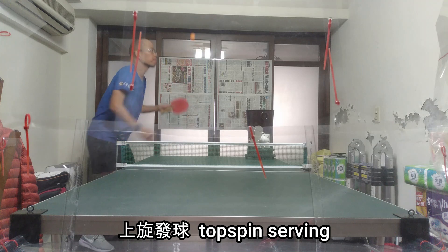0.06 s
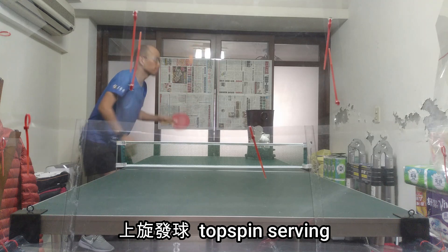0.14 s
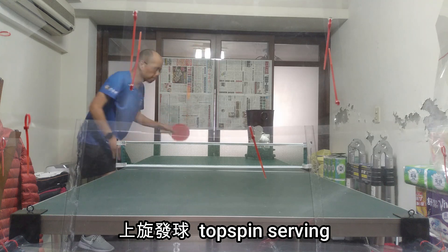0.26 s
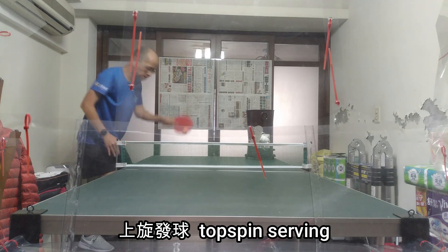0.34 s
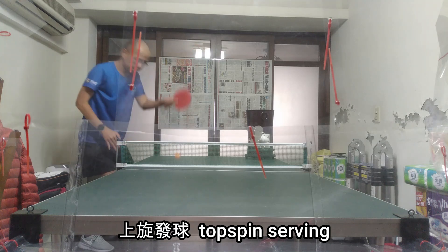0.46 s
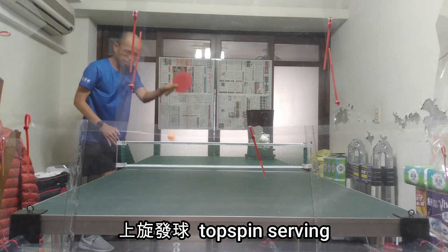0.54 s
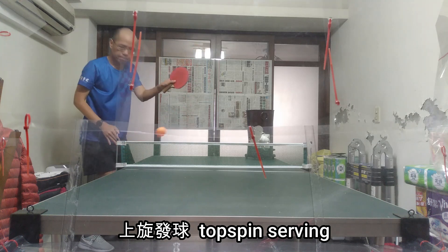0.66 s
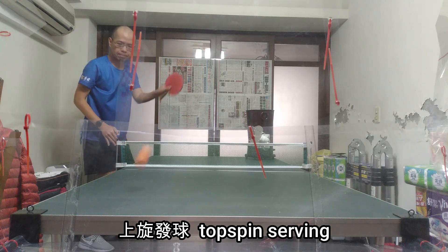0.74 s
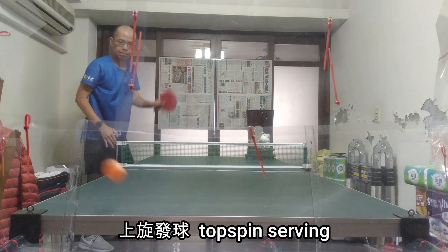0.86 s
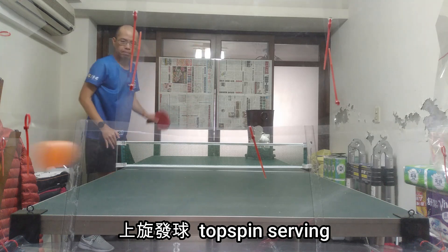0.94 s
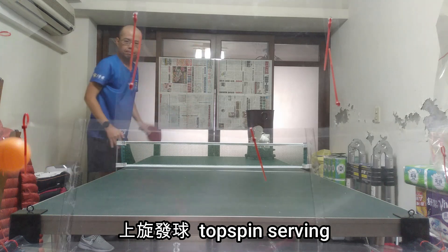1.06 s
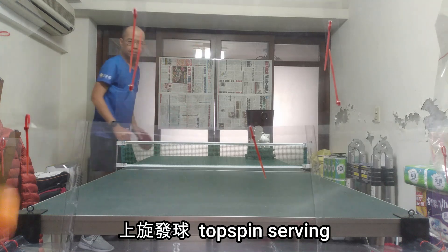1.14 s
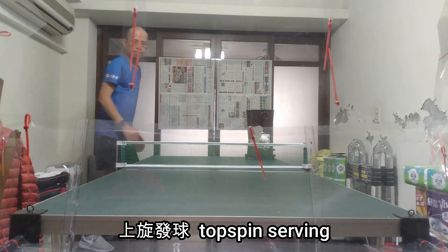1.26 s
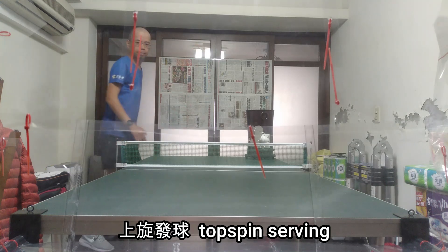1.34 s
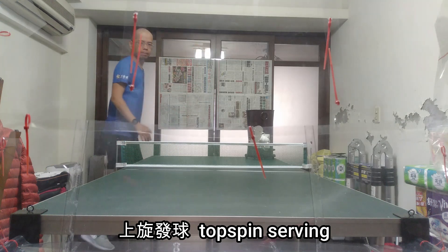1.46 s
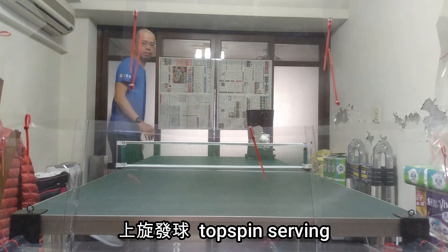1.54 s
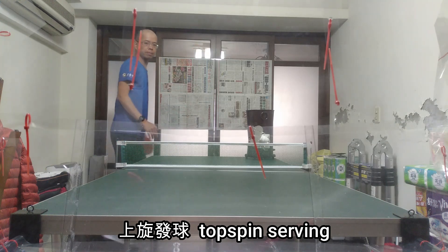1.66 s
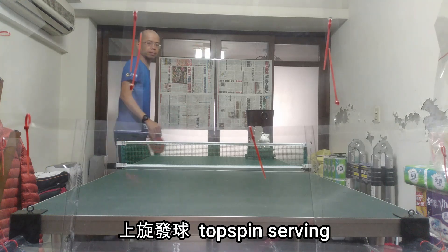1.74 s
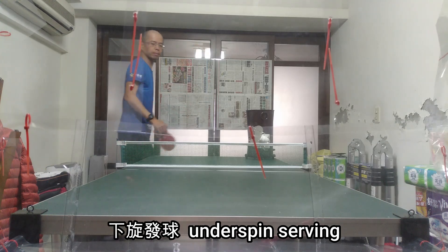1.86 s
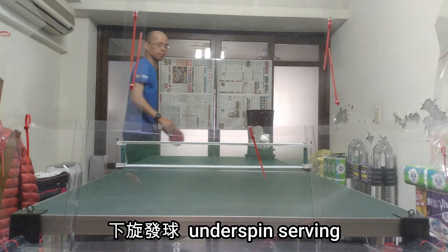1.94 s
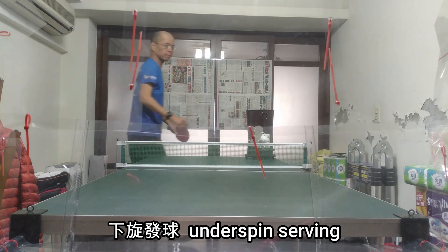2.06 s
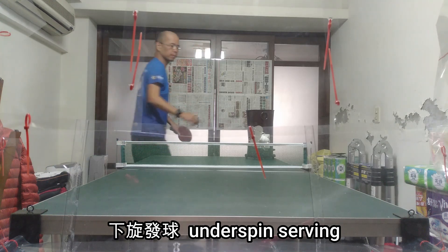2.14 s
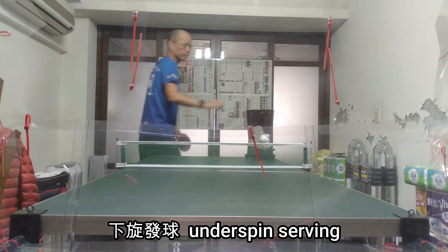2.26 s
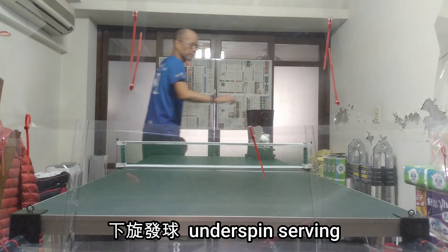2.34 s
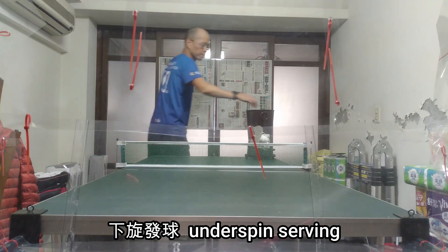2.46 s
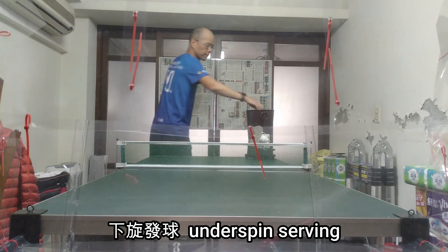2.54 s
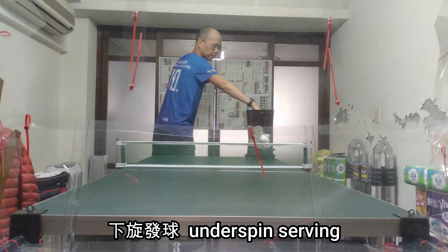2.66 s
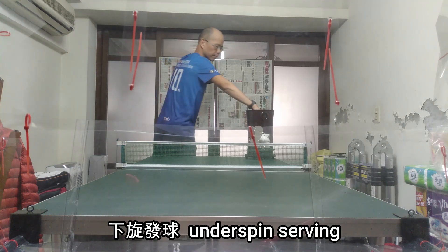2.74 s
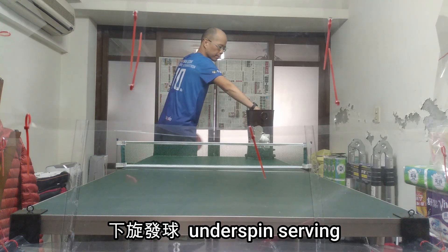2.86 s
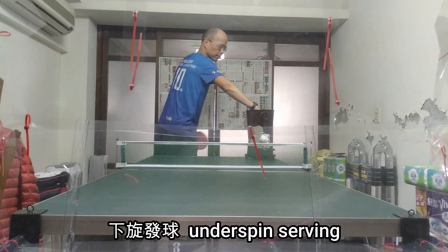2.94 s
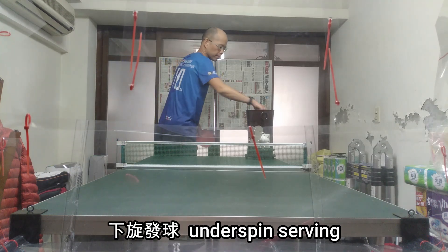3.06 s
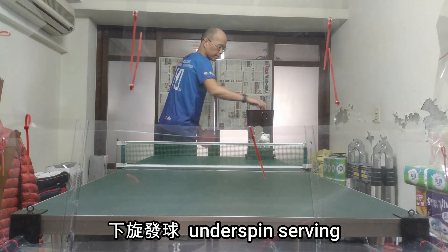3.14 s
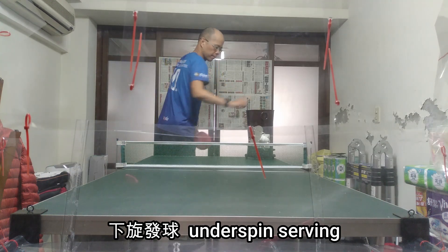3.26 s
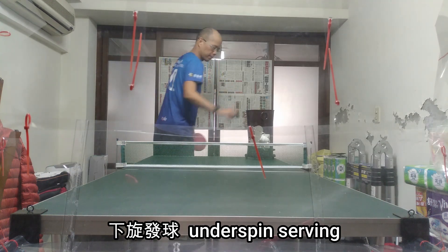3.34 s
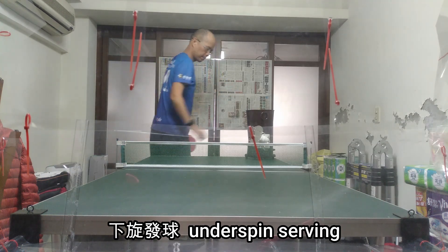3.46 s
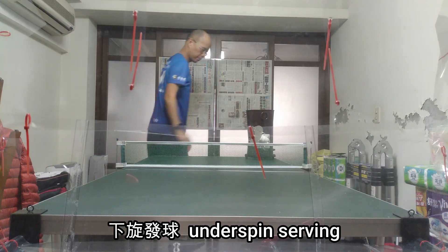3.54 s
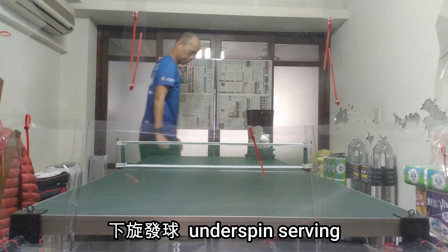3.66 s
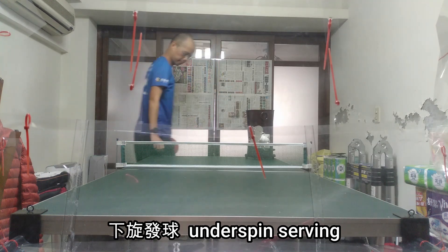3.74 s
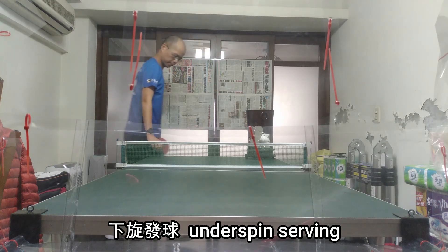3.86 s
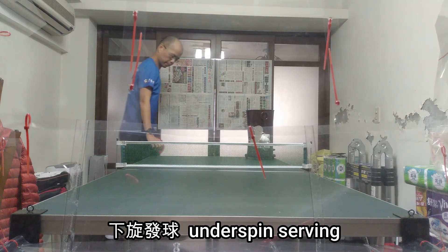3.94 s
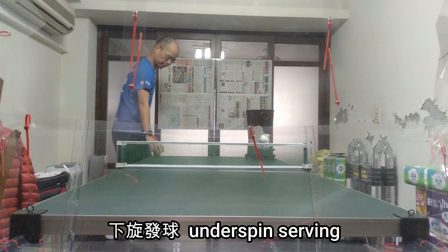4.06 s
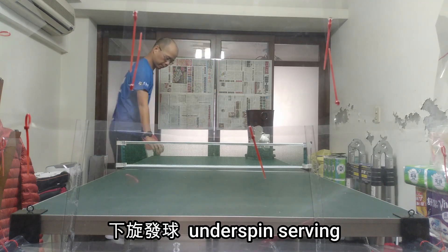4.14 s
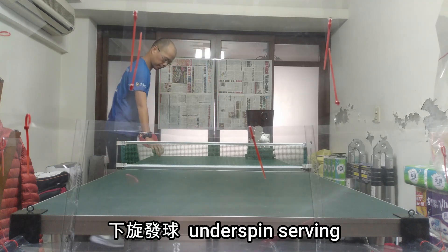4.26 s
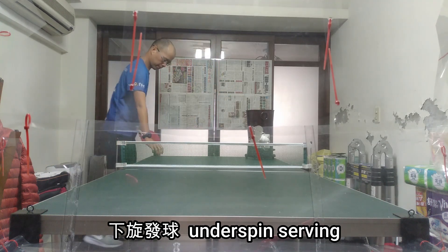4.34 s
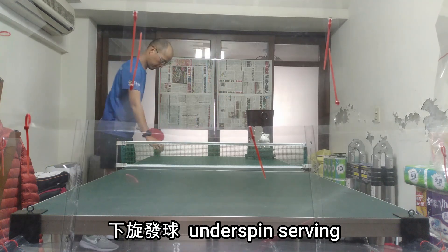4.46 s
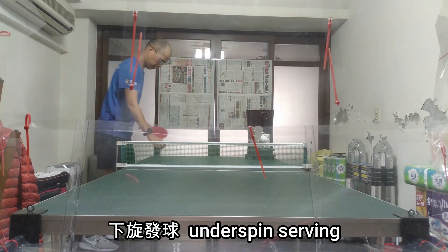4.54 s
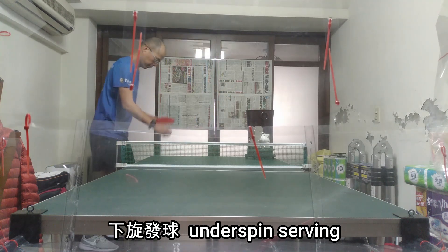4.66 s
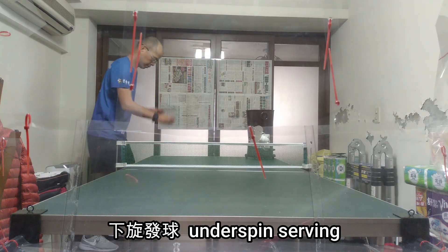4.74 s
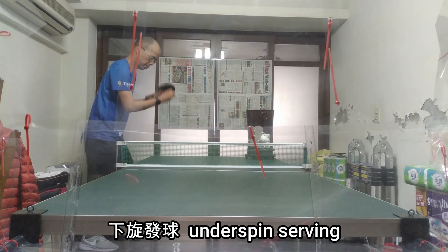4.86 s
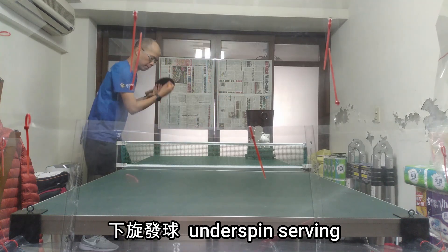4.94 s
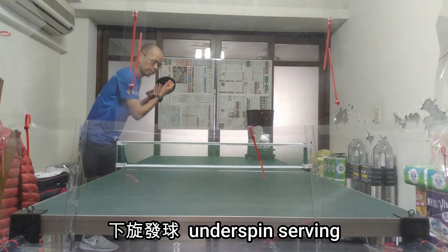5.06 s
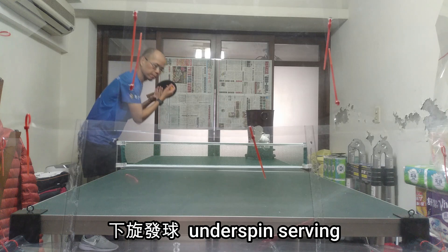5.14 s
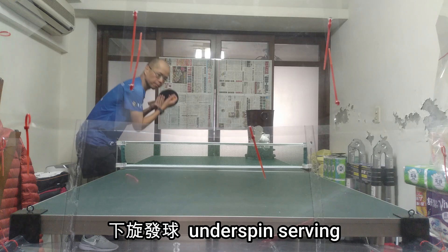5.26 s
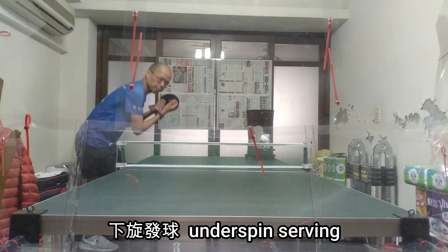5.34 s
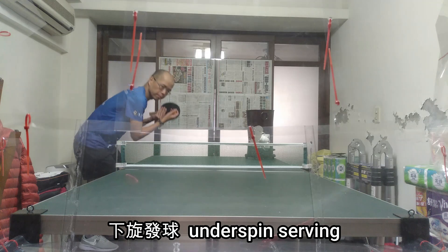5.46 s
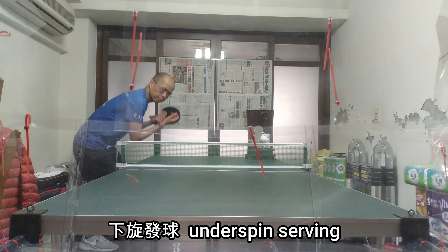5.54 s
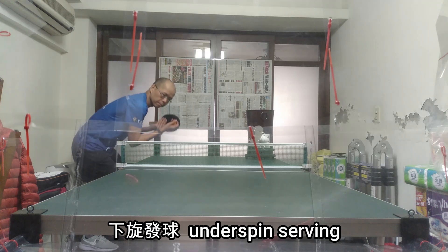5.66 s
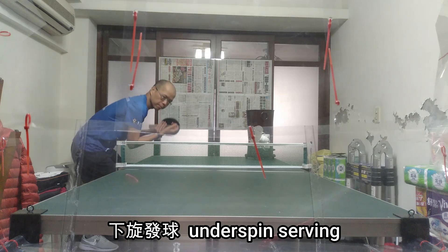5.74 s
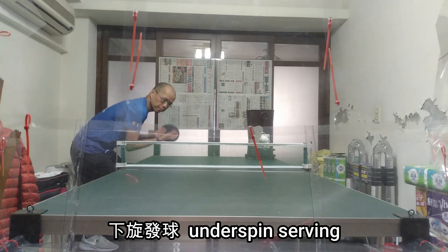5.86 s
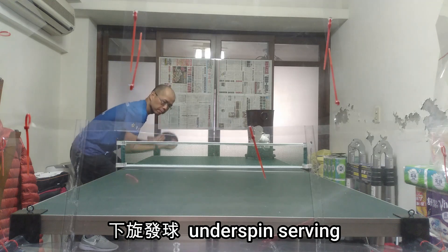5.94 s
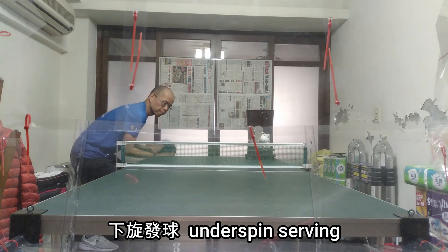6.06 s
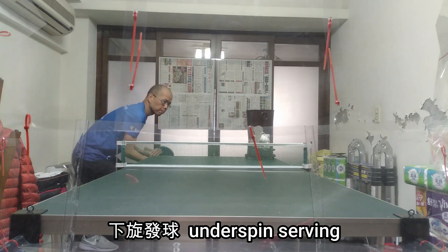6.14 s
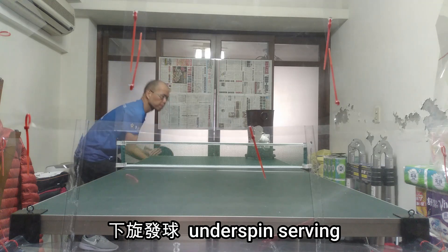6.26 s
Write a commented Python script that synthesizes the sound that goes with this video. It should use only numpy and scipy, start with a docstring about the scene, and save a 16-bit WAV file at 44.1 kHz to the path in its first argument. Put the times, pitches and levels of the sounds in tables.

```python
"""Table tennis ball in a small, hard-walled room, heard from the near end of the table.
A serve clicks off the paddle, bounces on both halves, knocks a guard panel by the microphone, ticks on the floor.
The player steps to a box of balls, rummages for one, walks back and bounces it twice on the far end.
Blows are contact pulses, body colours and ringing partials through a synthetic room; shaped noise makes
the sole brushes, the deep rumble that swells once, and the steady room air."""
import sys
import numpy as np
from scipy import signal
from scipy.fft import rfft, irfft
from scipy.io import wavfile

SR = 44100
rng = np.random.default_rng(int(sys.argv[2]) if len(sys.argv) > 2 else 0)


def persist_wave(psi):
    """Save psi, clipped to +-1, as 16-bit WAV."""
    counts = np.round(np.clip(psi, -1, 1) * 32767).astype(np.int16)
    wavfile.write(sys.argv[1], SR, np.atleast_2d(counts).T)


N = 277830
RING = SR  # samples per blow: 1 s
AGE = np.arange(RING) / SR  # s since the blow
FREQ = np.arange(RING // 2 + 1) * SR / RING  # Hz


# paddle strokes: [t/s, level/dB, contact/ms, bass/dB, treble/dB, direct sound/dB]
PADDLE_STROKES = [(0.3787, -31, .62, 1, -5.5, -18)]
# paddle sound per unit contact force: [f/Hz, level/dB]
PADDLE_COLOUR = [(100, -22.5), (455, -25.5), (500, -10.5), (560, -1.5), (680, -7.5), (920, -5.5),
                 (1080, 4.5), (1600, 1.5), (2200, 4.5), (3200, 0.5), (4500, 3.5), (7000, 12), (11000, 2),
                 (15000, 0)]


def strokes():
    """Rubber paddle: a lossy contact pulse drives the blade and the ball's shell."""
    out = np.zeros(N)
    for t_s, level_db, contact_ms, bass_db, treble_db, direct_db in PADDLE_STROKES:
        click = contact(contact_ms, loss=2.2) * body(PADDLE_COLOUR, bass_db, treble_db) * shell(db=2.5)
        add(out, t_s, level_db, click * room(direct_db, early_db=6.0))
    return out


# ball on table: [t/s, level/dB, contact/ms, edge nearness/0-1, bass/dB, treble/dB, direct sound/dB]
TABLE_BOUNCES = [(0.5018, -29.5, 0.61, 0.08, 2, -4, -24), (0.8539, -30.5, .635, 0, 0, -8, -16),
                 (4.1106, -36.5, 0.63, 0.43, 0.5, -6, -10), (4.3166, -40.5, 0.587, 0.31, 2, -6.5, -27)]
# table sound per unit contact force: [f/Hz, level/dB]
TABLE_COLOUR = [(50, -29.5), (75, -18.5), (130, -1.5), (220, -0.5), (330, -3.5), (480, 0.5), (750, 2.5),
                (1250, 2.5), (2000, 7.5), (3200, 13.5), (5000, 22), (7000, 23), (11000, 13.5), (15000, 8.5)]
# colour change where the frame stiffens the edge: [f/Hz, level/dB]
EDGE_COLOUR = [(100, -3.5), (140, 5), (185, 7), (300, -1), (550, -17), (850, -5.5), (1200, 14),
               (1600, -1.5), (2200, -7), (4000, -6)]
# lowest bending modes of the table: [f/Hz, level/dB, t60/s]
TABLE_BENDING = [(92.4, -14, 0.89), (137.8, -13, 0.82), (216.4, -19.5, .45)]
TABLE_LOSS, BOOM_BUILD_S = 0.72, 0.02


def bounces():
    """Table top: a contact pulse clicks the plate and its bending modes boom."""
    out = np.zeros(N)
    for t_s, level_db, contact_ms, edge, bass_db, treble_db, direct_db in TABLE_BOUNCES:
        top = body(TABLE_COLOUR, bass_db, treble_db) * body(EDGE_COLOUR) ** edge
        click = contact(contact_ms, TABLE_LOSS) * top * shell(db=2)
        heard = unit(click * room(direct_db, build_s=0.004, early_db=3.0))
        boom = undb(-12 * edge) * ring(TABLE_BENDING, BOOM_BUILD_S)  # middle booms most
        add(out, t_s, level_db, heard + boom)
    return out


# ball hopping on the floor: [t/s, level/dB]
FLOOR_HOPS = [(1.7156, -57.5), (1.8420, -60), (1.9825, -68.5)]
# colour of a floor hop: [f/Hz, level/dB]
HOP_COLOUR = [(300, -8), (1000, 1.5), (1800, 16), (3500, 23.5), (5500, 19.5), (8000, 34.5), (11000, 28.5),
              (15000, 22)]
HOP_DIRECT_DB, HOP_PING_DB = -7, -9


def hops():
    """Hard floor: a longer contact pulse gives faint, bright ticks."""
    out = np.zeros(N)
    for t_s, level_db in FLOOR_HOPS:
        tick = contact(ms=0.884, loss=1.0) * body(HOP_COLOUR) * shell(db=HOP_PING_DB)
        add(out, t_s, level_db, tick * room(HOP_DIRECT_DB, dull_hz=6000))
    return out


def contact(ms, loss):
    """Half-sine push of the ball: its length cuts evenly spaced notches, which a lossy contact fills in."""
    part = np.minimum(AGE * 1000 / ms, 1)
    return rfft(np.sin(np.pi * part) * np.exp(-loss * part))


# resonances of the ball's hollow shell: [f/Hz, width/Hz, level/dB]
SHELL_MODES = [(8450, 200, 17), (9940, 630, 9.5), (11000, 400, 9.5), (12450, 400, 4.5)]


def shell(db):
    """The ball's own resonances add a thin ping on top of a blow."""
    ping = 0
    for hz, width_hz, gain_db in SHELL_MODES:
        damping = 1j * FREQ * width_hz
        ping = ping + undb(db + gain_db) * damping / (hz ** 2 - FREQ ** 2 + damping)
    return 1 + ping


# ball against the guard panel: [t/s, level/dB, bass/dB, treble/dB, direct sound/dB]
PANEL_KNOCKS = [(1.0289, -23, 2, -1.5, -1.5), (1.2902, -30, 1.5, -4, -16), (1.6087, -42, -7, -6, -0.5)]
# colour of a knock: [f/Hz, level/dB]
KNOCK_COLOUR = [(30, -26.5), (70, -2), (300, -6.5), (600, 2), (900, -1.5), (1400, -2.5), (2200, -5),
                (3500, -8.5), (6800, -10.5), (8200, -22), (9800, -32), (15000, -48)]
# ringing partials heard after a knock near the microphone: [f/Hz, level/dB, t60/s]
KNOCK_PARTIALS = [(91.5, -7, 0.53), (447, -10, 0.19), (593, -1, 0.43), (666, -9.5, 0.2), (789, -6.5, 0.59),
                  (853, -6.5, .5), (1059, -9.5, 0.56), (1237, -7.5, 0.6), (1408, -3.5, 0.34),
                  (1720, -6.5, 0.27), (2111, -11.5, 0.54), (2380, -12.5, 0.71), (2751, -9, 0.3),
                  (3520, -11, 0.4)]
CRACK_DB, CRACK_DECAY_S = -4.5, 0.0045  # before knock colour; dB re direct-path gain
KNOCK_RING_DB = -14


def knocks():
    """The stray ball hits the guard panel: a click, a brief crack and a mixed ring of panel and room."""
    out = np.zeros(N)
    for t_s, level_db, bass_db, treble_db, direct_db in PANEL_KNOCKS:
        burst = rng.standard_normal(RING) * np.exp(-AGE / CRACK_DECAY_S)
        crack = undb(direct_db + CRACK_DB) * unit(rfft(burst))
        path = room(direct_db, build_s=0.0013, early_db=0.5, early_s=0.054, dull_hz=1700) + crack
        knock = body(KNOCK_COLOUR, bass_db, treble_db, treble_hz=4450) * path
        add(out, t_s, level_db, unit(knock) + undb(KNOCK_RING_DB) * ring(KNOCK_PARTIALS))
    return out


# balls jostling in the box: [t/s, level/dB, bass/dB, treble/dB]
BOX_JOSTLES = [(2.7255, -62.5, -10, 10), (2.757, -57, 1, 7), (2.775, -55, 5, 3), (2.8265, -54, 9, -5),
               (2.8768, -50, 4, 3), (2.940, -54, -4, 3.5), (3.019, -57.5, 5, -12), (3.091, -48, -10.5, 2.5),
               (3.116, -48.5, 0, 5), (3.2545, -56.5, -15, -3.5)]
# colour of the box of balls: [f/Hz, level/dB]
BOX_COLOUR = [(150, -6), (330, 1), (540, -1), (650, 10.5), (820, 4.5), (1150, 3.5), (1800, -6.5),
              (3200, -11), (5000, -23), (8000, -26), (11000, -39), (15000, -46)]
BOX_DIRECT_DB = -9.5


def ball_box():
    """A hand stirs the balls: each one it moves knocks three neighbours in quick succession."""
    out = np.zeros(N)
    for t_s, level_db, bass_db, treble_db in BOX_JOSTLES:
        lags_s = rng.uniform(0.00221, 0.03, size=3)
        chain = 1 + undb(-9.5) * sum(np.exp(-2j * np.pi * FREQ * lag_s) for lag_s in lags_s)
        rattle = chain * body(BOX_COLOUR, bass_db, treble_db) * shell(db=-8)
        add(out, t_s, level_db, rattle * room(BOX_DIRECT_DB, build_s=0.0012, early_db=1))
    return out


# footfalls: [t/s, level/dB, bass/dB, scuff/dB, floor boom/dB]
FOOTFALLS = [(.032, -55.5, -5.5, -9, -8), (2.082, -51.5, -6, -19, -9), (3.906, -55, -3.5, -18, -4),
             (3.97, -46.5, 10, -21, 9), (4.486, -49.5, -2, -15, -0.5), (4.996, -50.5, -3, -8, -4),
             (5.095, -53, -2.5, -17.5, -4.5)]
# colour of a footfall: [f/Hz, level/dB]
FOOT_COLOUR = [(25, -28.5), (45, -13), (70, -0.5), (130, 0.5), (220, -5.5), (350, -16), (700, -13.5),
               (2000, -29), (7000, -27.5), (12000, -62)]
# deep modes the player's weight sets ringing: [f/Hz, level/dB, t60/s]
FLOOR_BENDING = [(55.2, -2, 0.66), (68.6, 0.5, 0.43), (132.3, -4, .8)]
STEP_DIRECT_DB, FLOOR_BUILD_S = -8.5, 0.015


def footwork():
    """Soft footfalls thud and set the floor's deep modes booming, each by its own amount."""
    out = np.zeros(N)
    for t_s, level_db, bass_db, scuff_db, boom_db in FOOTFALLS:
        foot = body(FOOT_COLOUR, bass_db, scuff_db, bass_hz=116.9, treble_hz=437)
        thud = foot * room(STEP_DIRECT_DB, build_s=0.0034, early_db=-0.5, dull_hz=700)
        boom = undb(boom_db) * ring(FLOOR_BENDING, FLOOR_BUILD_S)
        add(out, t_s, level_db, unit(thud) + boom)
    return out


# soles brushing the floor: [t/s, level/dB, rise/s]
SOLE_BRUSHES = [(2.236, -69.5, 0.012), (3.755, -70.5, 0.05)]
# colour of a brushing sole: [f/Hz, level/(dB per Hz)]
SOLE_COLOUR = [(300, 0), (850, -0.5), (1500, -7.5), (4500, -9.5), (7000, -9.5), (9000, -28), (15000, -30)]
BRUSH_FADE_S = 0.026


def brushes():
    """A sole drags lightly: gritty friction grows, then dies as the foot stops."""
    out = np.zeros(N)
    for t_s, level_db, rise_s in SOLE_BRUSHES:
        press = np.minimum(AGE / rise_s, 1) * np.exp(-np.maximum(AGE - rise_s, 0) / BRUSH_FADE_S)
        grit = rng.standard_normal(RING) * undb(3.2 * rng.exponential(size=RING))
        add(out, t_s, level_db, rfft(press * grit) * body(SOLE_COLOUR) * room(STEP_DIRECT_DB))
    return out


# colour of the deep rumble: [f/Hz, level/(dB per Hz)]
RUMBLE_COLOUR = [(25, -43.5), (42, -9), (58, 1.5), (85, -12.5), (125, -13), (250, -30.5), (600, -72.5)]
RUMBLE_DB = -64
# one swell while the player is at the box and walks back
SWELL_S, SWELL_DB, SWELL_RISE_S, SWELL_HOLD_S, SWELL_FALL_S = 2.62, -55.5, 0.38, 0.25, 1


def rumble():
    """Deep steady noise with one swell that rises, holds and falls; powers add."""
    corners_s = SWELL_S + np.cumsum([0, SWELL_RISE_S, SWELL_HOLD_S, SWELL_FALL_S])
    swell = np.interp(np.arange(N) / SR, corners_s, [0, 1, 1, 0])
    return noise(RUMBLE_COLOUR, 0) * np.hypot(undb(RUMBLE_DB), undb(SWELL_DB) * swell)


# steady room air: [f/Hz, level/(dB per Hz)]
AIR_COLOUR = [(30, -7.5), (52, -1), (130, -2), (250, -5), (500, -11.5), (1000, -13), (2500, -18),
              (5000, -23), (8000, -30.5), (12000, -36.5), (15500, -47)]
AIR_DB = -68.5


def air():
    """Steady broadband noise that darkens toward the treble."""
    return noise(AIR_COLOUR, AIR_DB)


# reverberation time: [f/Hz, t60/s]
ROOM_DECAY = [(60, 0.23), (250, 0.49), (700, 0.45), (1500, 0.51), (3500, 0.53), (7000, 0.48), (14000, 0.45)]


def room(direct_db, build_s=0.0027, dense_s=0.018, early_db=3, early_s=0.014, bend_s=0.0007, dull_hz=2500):
    """Path from one spot to the microphone: direct sound, then echoes that thicken into a tail."""
    density = np.clip((AGE / dense_s) ** 2, 0.15, 1)
    sparse = rng.standard_normal(RING) * (rng.random(RING) < density)
    echoes = rfft(sparse / np.sqrt(density))
    centres_hz = np.transpose(ROOM_DECAY)[0]
    tail = 0
    for share, (_, t60_s) in zip(np.eye(len(centres_hz)), ROOM_DECAY):
        band = irfft(echoes * along(np.column_stack([centres_hz, share]), FREQ))
        tail = tail + band * np.exp(-np.log(1000) * AGE / t60_s)
    tail = tail * (1 - np.exp(-AGE / build_s)) * undb(early_db * np.exp(-AGE / early_s))
    # low bending waves cross a plate more slowly, which smears the click; bend_s is the delay at 1 kHz
    smear = np.exp(-4j * np.pi * bend_s * np.sqrt(1000 * FREQ))
    direct = smear / (1 + 1j * FREQ / dull_hz)
    return unit(rfft(tail)) + undb(direct_db) * direct


def body(points, bass_db=0, treble_db=0, bass_hz=480, treble_hz=3000):
    """Causal (minimum-phase) response of a struck thing; each blow shifts its bass and treble."""
    bass = bass_db / (1 + (FREQ / bass_hz) ** 4)
    treble = treble_db * (1 - 1 / (1 + (FREQ / treble_hz) ** 4))
    cepstrum = irfft(np.log(undb(along(points, FREQ) + bass + treble)))
    cepstrum[1:RING // 2] *= 2
    cepstrum[RING // 2 + 1:] = 0
    return np.exp(rfft(cepstrum))


def ring(partials, build_s=1e-4):
    """Partials that build up and fade after a blow; each level is that partial's total energy."""
    total = np.zeros(RING)
    for hz, level_db, t60_s in partials:
        fade = np.exp(-np.log(1000) * AGE / t60_s)
        wave = np.sin(2 * np.pi * hz * AGE) * fade * (1 - np.exp(-AGE / build_s))
        total += undb(level_db) * wave / np.linalg.norm(wave)
    return rfft(total)


def add(out, t_s, level_db, spectrum):
    """Place a blow at t_s; its level is the rms of the first 50 ms."""
    blow, start = irfft(spectrum), int(t_s * SR)
    blow = blow * undb(level_db) / np.sqrt(np.mean(blow[:SR // 20] ** 2))
    out[start:start + RING] += blow[:N - start]


def noise(points, level_db):
    """Steady noise of a given colour and rms level."""
    freq_hz = np.arange(N // 2 + 1) * SR / N
    hiss = irfft(rfft(rng.standard_normal(N)) * undb(along(points, freq_hz)), N)
    return hiss * undb(level_db) / np.sqrt(np.mean(hiss ** 2))


def along(points, freq_hz):
    """Read (Hz, value) points on a log-frequency axis."""
    hz, value = np.transpose(points)
    return np.interp(np.log(freq_hz + 1), np.log(hz), value)


def unit(spectrum):
    """Scale a response to unit energy."""
    return spectrum / np.sqrt(np.mean(np.abs(spectrum) ** 2))


def undb(db):
    """Decibels to gain."""
    return 10 ** (np.asarray(db) / 20)


def scene():
    """Everything in the room, on one channel."""
    ball = strokes() + bounces() + hops() + knocks()
    player = ball_box() + footwork() + brushes()
    return (ball + player + rumble() + air())[None]


MIC_LOW_HZ, TOP_HZ = 42.6, 15700


def record(dry):
    """The microphone loses the deepest bass and the recorder cuts the top."""
    low_cut = signal.butter(4, MIC_LOW_HZ, "high", fs=SR, output="sos")
    top_cut = signal.ellip(10, 0.2, 70, TOP_HZ, fs=SR, output="sos")
    thinned = signal.sosfilt(low_cut, dry)
    return signal.sosfilt(top_cut, thinned)


dry = scene()
out = record(dry)
persist_wave(out)
```